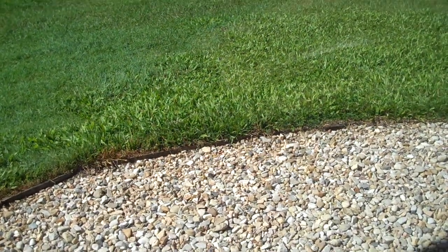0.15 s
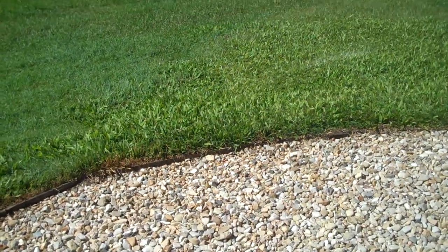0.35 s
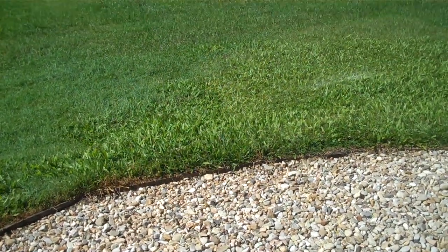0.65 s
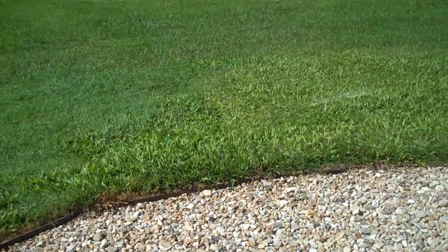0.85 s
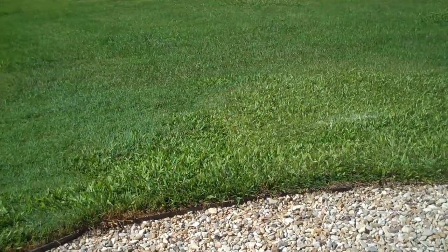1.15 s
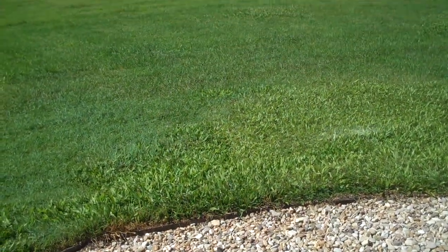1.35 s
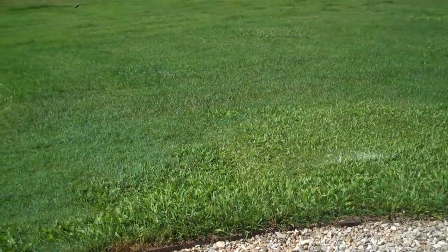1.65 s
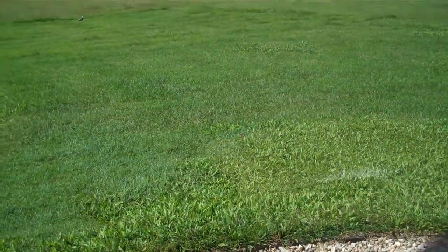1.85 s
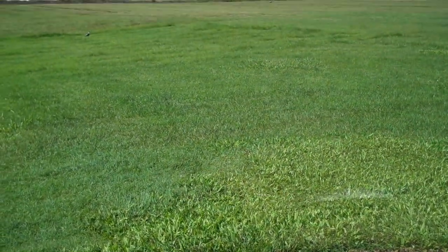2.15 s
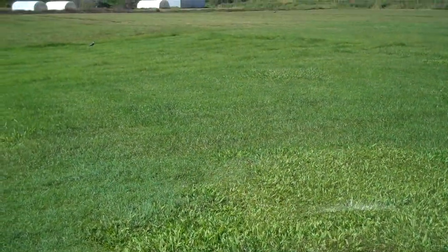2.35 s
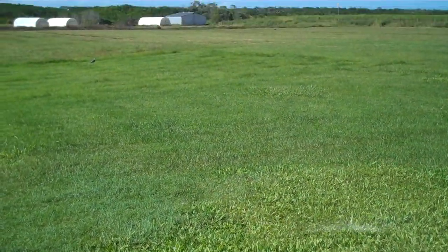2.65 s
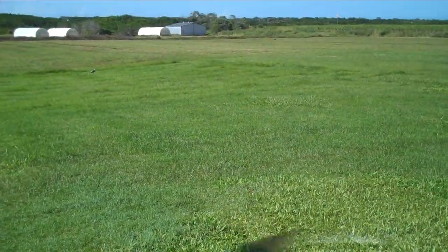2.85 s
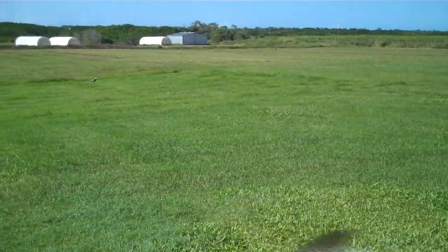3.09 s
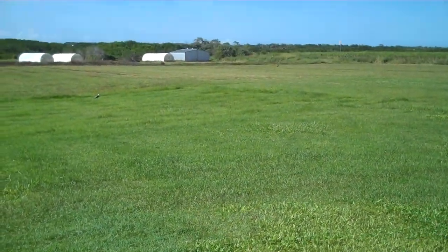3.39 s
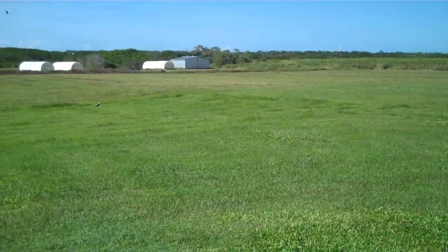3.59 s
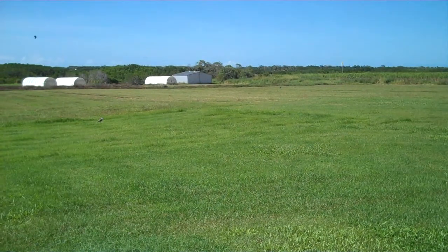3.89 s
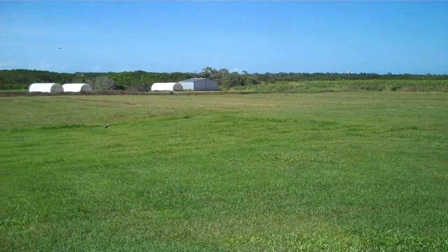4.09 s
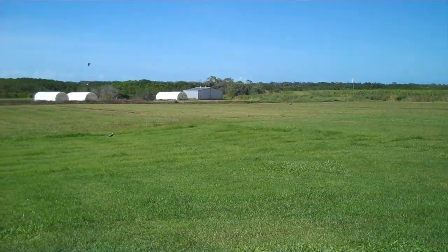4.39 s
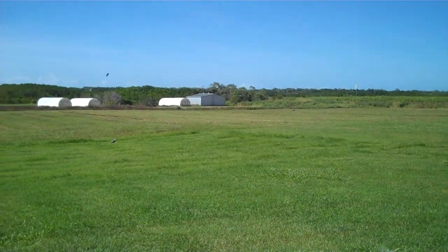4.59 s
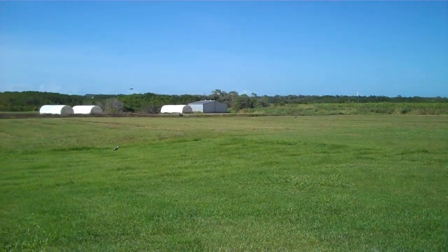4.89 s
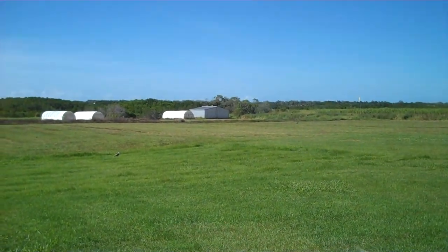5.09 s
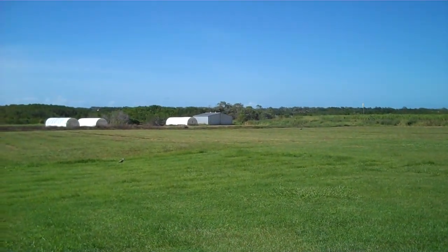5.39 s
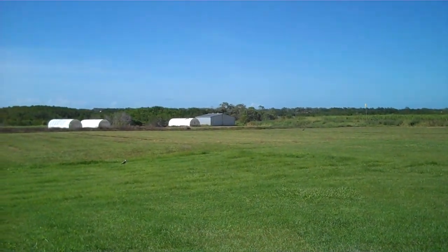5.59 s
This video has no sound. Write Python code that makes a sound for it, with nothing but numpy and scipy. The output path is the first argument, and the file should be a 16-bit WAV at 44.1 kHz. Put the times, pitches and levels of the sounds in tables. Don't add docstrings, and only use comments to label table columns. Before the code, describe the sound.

A light piston helicopter runs loudly beside the camera over open grass: a deep buzzing drone, quick two-blade chop, fan whine and hissing swish. From about two seconds it turns away, pitch sinking, while gusts of downwash roar past. The low buffeting dips, then returns with rougher blade slap. Outdoors, small stereo camera microphone, bassy, slightly overloaded, with uneven left and right treble.

```python
import sys
import numpy as np
from scipy import signal
from scipy.fft import rfft, irfft, next_fast_len
from scipy.io import wavfile
from scipy.ndimage import uniform_filter1d, map_coordinates

SR = 44100
rng = np.random.default_rng(int(sys.argv[2]) if len(sys.argv) > 2 else 0)


def to_wav(sig):
    pcm = np.clip(np.atleast_2d(sig), -1, 1) * 32767
    pcm = np.round(pcm).astype(np.int16)
    wavfile.write(sys.argv[1], SR, pcm.T)


def to_linear_factor(level_db):
    exponent = np.asarray(level_db, float) / 20
    return 10 ** exponent


N = 253134


def unit(x):
    return x / np.sqrt(np.mean(x ** 2) + 1e-20)


def along(points, hz):
    f, v = np.transpose(points)
    return np.interp(np.log(hz + 1), np.log(f + 1), v)


def curves(rows):
    s, *cols = np.transpose(rows)
    return [np.interp(np.arange(N) / SR, s, c) for c in cols]


def swells(rows):
    t = np.arange(N) / SR
    return sum(db * np.exp(-((t - s) / half) ** 2) for s, db, half in rows)


def wobble(rate):
    coarse = np.arange(0, N + 64, 64)
    knots = rng.standard_normal(int(N * rate / SR) + 4)
    return np.interp(np.arange(N), coarse, map_coordinates(knots, [coarse * rate / SR]))


def tone(turns, db):
    return np.sqrt(2) * to_linear_factor(db) * np.cos(2 * np.pi * turns)


def gate(turns, sharp):
    return unit(np.exp(sharp * np.cos(2 * np.pi * turns)))


def filtered(x, response):
    pad = SR // 4
    m = next_fast_len(N + 2 * pad)
    x = np.pad(x, ((0, 0), (pad, pad)), "reflect")
    return irfft(rfft(x, m) * response(np.fft.rfftfreq(m, 1 / SR)), m)[:, pad:pad + N]


# f/Hz, likeness [0-1]
LIKENESS = [(60, 0.8), (250, 1), (500, 0.95), (1000, 0.92), (1600, 0.72), (2300, 0.24), (4000, 0.075),
            (14000, 0.13)]


def rush(spectrum, patchy_db, blade=None, sharp=0, lag=0):
    hz, s, z = signal.stft(rng.standard_normal((2, N)), SR, nperseg=512)
    patches = uniform_filter1d(uniform_filter1d(rng.standard_normal(z.shape[1:]), 5, 0), 10, 1)
    z = z * to_linear_factor(patchy_db * unit(patches))
    if blade is not None:
        turns = np.interp(s * SR, np.arange(N), blade) - lag * (10 - hz[:, None] / 1000)
        z = z * np.exp(sharp * np.cos(2 * np.pi * turns))
    pair = signal.istft(z, nperseg=512)[1][:, :N]
    closed = [(5, -120)] + spectrum + [(20000, -120)]

    def mid_side(hz):
        angle = np.arccos(np.clip(along(LIKENESS, hz), -1, 1)) / 2
        return to_linear_factor(along(closed, hz)) * np.array([np.cos(angle), np.sin(angle)])

    mid, side = filtered(pair, mid_side)
    return unit(np.array([mid + side, mid - side]))


# t/s, level/dB
WAKE = [(0, 0), (.4, 0), (2, 0.5), (2.9, 0), (3.3, -1.5), (3.8, -3), (4.25, 4), (4.68, 6.5), (5.2, 5),
        (5.74, 4.5)]
# t/s, rise level/dB, half length [s]
GUSTS = [(2.1, 4, .05), (2.42, 9, 0.11), (2.75, 9, 0.083), (3.05, 8.5, 0.057), (3.35, 8.5, 0.059),
         (3.6, 3.5, 0.1), (3.9, 6.5, 0.057), (4.12, 3, 0.1), (4.55, 3, 0.12), (5.55, 2.5, .05)]
# level/dB at rest, share of wake swing [ratio], share of gust rise [ratio]
AIR_LAYERS = dict(buffet=(-24.5, 1, 0), rumble=(-28, 1.2, .1), exhaust=(-33.5, .8, 0.57),
              wash=(-48, 1.19, 1), air=(-56, 1.06, 0.32), tail=(-65.5, 1.56, .2))


def layer_db(name):
    rest_db, wake, gust = AIR_LAYERS[name]
    return rest_db + wake * curves(WAKE)[0] + gust * swells(GUSTS)


# t/s, turned away [0 side-on to 1 tail-on]
HEADING = [(0, 0.24), (.6, 0.18), (1.15, 0.02), (1.7, 0.1), (2.35, 0.66), (2.9, 0.52), (3.5, 0), (4.1, 0.5),
           (4.5, 1), (5.45, 0.8), (5.74, 0.7)]


def turned_away():
    return np.clip(curves(HEADING)[0], 0, 1)


# t/s, firing tone level/dB, octave level/dB
EXHAUST_NOTE = [(0, -11.5, -30.5), (.6, -10, -38), (1.13, -10.5, -36), (1.7, -11, -30.5), (2.05, -8, -34),
                (2.34, -13, -24.5), (2.9, -13, -21), (3.3, -16, -24.5), (3.55, -13.5, -27.5),
                (3.75, -22, -28), (4.1, -32.5, -30.5), (4.5, -22.5, -19.5), (4.9, -37, -31.5),
                (5.17, -21.5, -26.5), (5.45, -20, -31.5), (5.74, -15.5, -34)]
# t/s, level/dB
BLADE_SCATTER = [(0, -30), (1.1, -34.5), (1.7, -27.5), (2.35, -23), (3.55, -22.5), (3.8, -34.5), (4.5, -36),
                 (4.9, -20), (5.17, -24), (5.74, -28)]
# f [multiples of camshaft rate], side-on level/dB, turned-away level/dB
UNEVEN_CYLINDERS = [(2, -36, -33), (3, -37, -40), (4, -41.5, -47.5), (5, -33, -37.5), (7, -44, -39.5),
                    (8, -35, -43), (9, -51.5, -25), (10, -35.5, -37.5), (14, -41, -27.5), (15, -46, -40.5),
                    (16, -53, -49.5), (18, -43, -30.5), (20, -48.5, -38), (24, -43.5, -38),
                    (36, -52.5, -43.5), (42, -53, -57), (45, -63.5, -46.5), (48, -63.5, -50.5),
                    (54, -55.5, -46), (60, -63, -64.5), (65, -64, -51), (88.3, -77, -55)]


def engine(firing, disc):
    first_db, octave_db = curves(EXHAUST_NOTE)
    scatter_db, away = curves(BLADE_SCATTER)[0], turned_away()
    drone = tone(firing + 0.0093 * wobble(17), first_db + (0.34 + 2.7 * away) * wobble(13))
    drone += tone(firing + disc + 0.33, scatter_db)
    drone += tone(firing - disc + 0.33, scatter_db - 9.5 + 2 * wobble(3))
    drone += tone(firing + 2 * disc + 0.87, scatter_db - 19.5 + 3 * wobble(4.2))
    upper = tone(2 * firing + 0.14 * wobble(16), octave_db - 0.7 + 3.4 * wobble(16))
    for multiple, side_db, away_db in UNEVEN_CYLINDERS:
        db = side_db + away * (away_db - side_db) + 1.5 * wobble(7)
        blur = (0.03 + 0.003 * multiple) * wobble(8)
        upper += tone(round(multiple) * firing / 6 + rng.random() + blur, db)
    return drone + upper * gate(disc + 0.42, sharp=0.11)


# f [multiples of blade rate], side-on level/dB, turned-away level/dB, phase offset [turns]
THUMP_LINES = [(1, -33.5, -45, 0.33), (2, -47, -31.5, 0.72), (3, -41.5, -43, 0.11), (4, -41.5, -31.5, 0.54),
               (6, -31.5, -30, 0.35), (7, -45, -31, .4)]
# t/s, level/dB, half length [s]
LULLS = [
    (2.5, -4.5, 0.14),
    (3.68, -19, .22),
]


def thump(disc):
    away, lull_db = turned_away(), 0.4 * swells(LULLS)
    total = 0
    for multiple, side_db, away_db, phase_offset in THUMP_LINES:
        turns = round(multiple) * disc + phase_offset + 0.038 * wobble(3)
        total = total + tone(turns, side_db + away * (away_db - side_db) + 1.5 * wobble(2.0) + lull_db)
    return total


# t/s, rise level/dB, half length [s]
SLAP_BOUTS = [
    (4.7, 9, 0.11),
    (5.2, 7.5, .18),
    (5.74, -8, 0.22),
]


def slap(disc):
    since = disc - 0.73
    burst = gate(since, sharp=8) * tone(11 * since + 0.05 * wobble(5), 2.2 * wobble(11))
    growing_db = -43 + 3 * np.arange(N) / SR
    return to_linear_factor(growing_db + swells(SLAP_BOUTS)) * burst


# f/Hz, level/dB
AIR_HISS = [(2000, -7), (3000, 2), (4000, 3.5), (5300, -0.5), (6300, 4.5), (7500, -0.5), (9000, -3.5),
            (10500, -10.5), (12000, -16), (14000, -23.5)]
SWISH_TAIL = [(5800, -29.5), (6800, -2.5), (7400, 1.5), (8100, 4), (8800, -10), (9700, -31)]
SWISH_SHOULDER = [(7000, -25), (8000, -5), (8800, 0), (9500, -3), (10300, -25)]
SWISH_CREST = [(8000, -18), (8900, -4.5), (9600, 1.5), (10500, -3), (11500, -19.5)]


def swish(blade):
    t = np.arange(N) / SR
    tail_db = layer_db("tail") + 1.15 * t
    crest_db = -58 - 9.5 / (1 + np.exp((3.05 - t) / 0.12))
    air = to_linear_factor(layer_db("air") + 4.5) * gate(blade - 0.12, sharp=0.067) * rush(AIR_HISS, patchy_db=1.13)
    tail = to_linear_factor(tail_db - 0.5) * rush(SWISH_TAIL, patchy_db=1.5, blade=blade - 0.05, sharp=0.4, lag=0.06)
    shoulder = to_linear_factor(tail_db - 5 + 1.5 * wobble(11))
    shoulder = shoulder * rush(SWISH_SHOULDER, patchy_db=2.2, blade=blade + 0.03, sharp=1.7, lag=0.07)
    crest = to_linear_factor(crest_db - 4.5 + 1.1 * wobble(12))
    crest = crest * rush(SWISH_CREST, patchy_db=-1.0, blade=blade + 0.01, sharp=1.9, lag=0.065)
    return air + tail + shoulder + crest


# t/s, f/Hz, level/dB
FAN_WHINE = [(0, 386.7, -31.5), (2.4, 384.1, -35), (3.4, 378, -34), (3.55, 375.8, -44.5),
             (4.1, 368.5, -46.5), (4.5, 368, -56), (5.74, 365.5, -48.5)]


def fan(disc):
    hz, db = curves(FAN_WHINE)
    broken = np.clip(4 * curves(HEADING)[0] - 0.6, 0.3, 1.6)
    turns = np.cumsum(hz) / SR + 0.14 * broken * wobble(12)
    carried_db = 0.6 * swells(GUSTS)
    chop = gate(disc + 0.33, sharp=0.12) * to_linear_factor(1.8 * broken * wobble(8.2) + carried_db)
    return chop * (tone(turns, db + 0.5) + tone(2 * turns, db - 19))


# f/Hz, side-on level/dB, turned-away level/dB, blur [turns]
PANEL_LINES = [(883, -56, -46, .25), (1050, -60, -49, .4), (1927, -66, -59, .25), (2315, -76, -67, .3),
               (2955, -73, -68, .2)]


def panels():
    t, away = np.arange(N) / SR, turned_away()
    total = 0
    for hz, side_db, away_db, blur in PANEL_LINES:
        db = side_db + away * (away_db - side_db) + 3 * wobble(5.5)
        total = total + tone(hz * t + blur * wobble(25), db)
    return total


# f/Hz, level/dB (buffet in dB per Hz)
BUFFET = [(12, -18), (25, -1), (45, -4), (70, 0), (100, 2.5), (140, -18)]
RUMBLE = [(60, -15.5), (100, -8), (140, 1), (180, 3), (230, -6), (330, -17), (500, -38.5)]
EXHAUST_ROAR = [(150, -44), (240, -0.5), (330, 0), (450, -7), (620, -7), (800, -13), (1000, -19),
                (1300, -23.5), (1800, -39.5), (2500, -62)]
DOWNWASH = [(500, -30), (900, 9.5), (1200, -0.5), (1500, -3), (1900, -3.5), (2150, -8.5), (3000, -13),
            (4200, -25), (6000, -32.5)]


def roar(blade):
    grit = wobble(40)
    buffet_db = layer_db("buffet") + swells(LULLS) - 4.5 + 1.1 * wobble(9.9)
    rumble_db = layer_db("rumble") + 0.5 + 0.15 * wobble(16)
    exhaust_db = layer_db("exhaust") + 4.5 + 0.96 * grit
    wash_db = layer_db("wash") + 4.0 + 1.0 * grit + 0.25 * wobble(10)
    buffet = to_linear_factor(buffet_db) * rush(BUFFET, patchy_db=3.2)
    rumble = to_linear_factor(rumble_db) * rush(RUMBLE, patchy_db=-2.14)
    exhaust = to_linear_factor(exhaust_db) * gate(blade - 0.35, sharp=0.06) * rush(EXHAUST_ROAR, patchy_db=0.94)
    wash = to_linear_factor(wash_db) * rush(DOWNWASH, patchy_db=0.5)
    return buffet + rumble + exhaust + wash


# t/s, f/Hz
FIRING_RATE = [(0.0, 135.17), (0.56, 135.53), (1.5, 134.66), (1.9, 133.14), (2.33, 130.23), (2.7, 128.27),
               (3.07, 126.87), (3.5, 124.68), (4.0, 121.7), (4.6, 119.21), (5.0, 117.36), (5.5, 115.42),
               (5.74, 114.26)]


def scene():
    firing = np.cumsum(curves(FIRING_RATE)[0]) / SR
    blade = 0.1005 * firing + 0.15
    disc = 0.1011 * firing + 0.07
    rotor = thump(disc) + slap(disc) + swish(blade)
    return engine(firing, disc) + rotor + fan(disc) + panels() + roar(blade)


# t/s, level/dB, hold [s]
DUCKS = [
    (1.144, -3, 0.35),
    (2.36, -1.5, .3),
    (4.687, -2, 0.18),
]


def ducking():
    t = np.arange(N) / SR
    total_db = 0
    for s, db, hold in DUCKS:
        step = np.clip((t - s) / 0.012, 0, 1)
        release = np.exp(-np.clip(t - s - hold, 0, None) / 0.18)
        total_db = total_db + db * step * release
    return to_linear_factor(total_db)


# f/Hz, level/dB
PORT_BALANCE = [(20, -11.5), (60, -5), (130, -3.5), (250, -1.5), (1200, -0.5), (2200, 0), (3500, -4),
                (6400, -5), (7100, -4.5), (7600, 13), (8200, 11.5), (10000, 6.5), (14000, 14.5)]
# f/Hz, phase lead [radians]
PORT_LEAD = [(30, .6), (70, .58), (130, .43), (260, .28), (400, .14), (900, .08), (1600, .15), (2400, .27)]


def ports(x):
    def both(hz):
        left = to_linear_factor(along(PORT_BALANCE, hz) / 2) * np.exp(0.5j * along(PORT_LEAD, hz))
        return np.array([left, 1 / left])
    return filtered(x, both)


# f/Hz, share of bands dropped [0-1]
DROPOUTS = [(1500, 0), (2600, .04), (5000, .05), (6000, .01), (8500, .02), (10000, .1), (11500, .22),
            (14000, .3)]


def treble_dropouts(x):
    hz, _, z = signal.stft(x, SR, nperseg=2048)
    dice = rng.random((2, len(hz) // 6 + 1, z.shape[2] // 2 + 1))
    dice = dice.repeat(6, 1).repeat(2, 2)[:, :len(hz), :z.shape[2]]
    port_share = np.array([[[0.6]], [[1.8]]])
    kept = dice > along(DROPOUTS, hz)[:, None] * port_share
    return signal.istft(z * kept, SR, nperseg=2048)[1][:, :N]


def roll_off(x):
    return signal.sosfilt(signal.butter(12, 14230, fs=SR, output="sos"), x)


def record(dry):
    x = ducking() * ports(dry)
    x = x / (1 + np.abs(x / 1.02) ** 8) ** (1 / 8)
    mix = treble_dropouts(x)
    return roll_off(mix)


dry = scene()
out = record(dry)
to_wav(out)
```